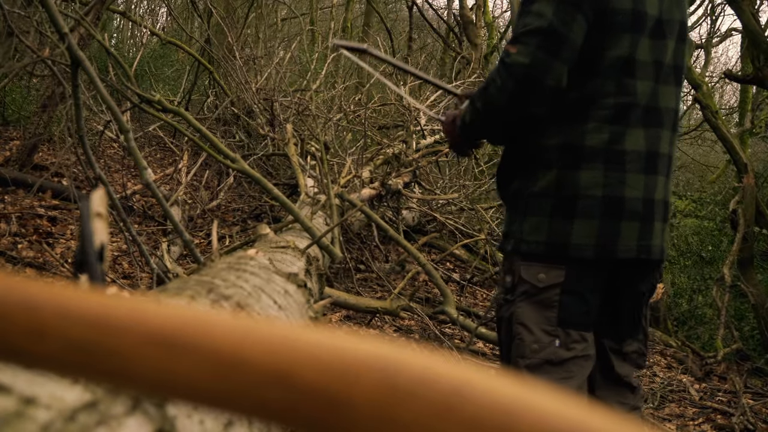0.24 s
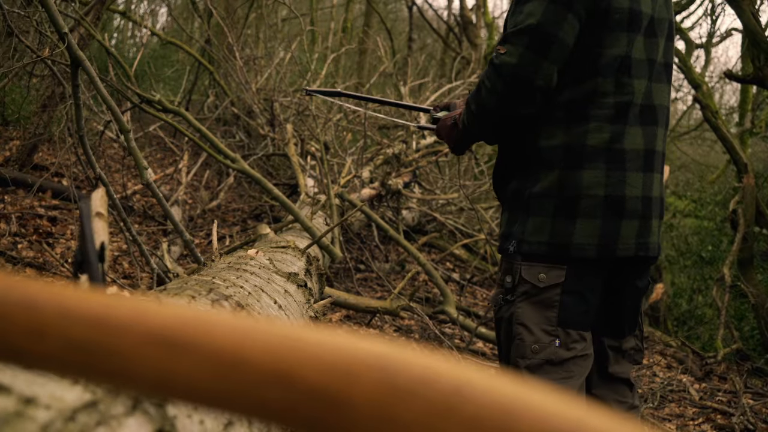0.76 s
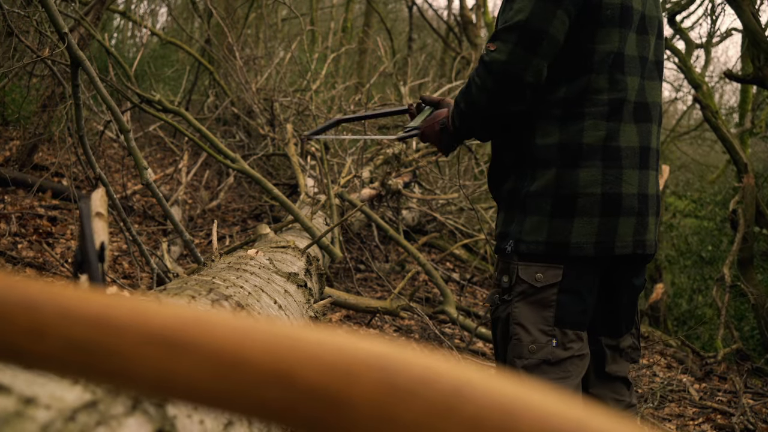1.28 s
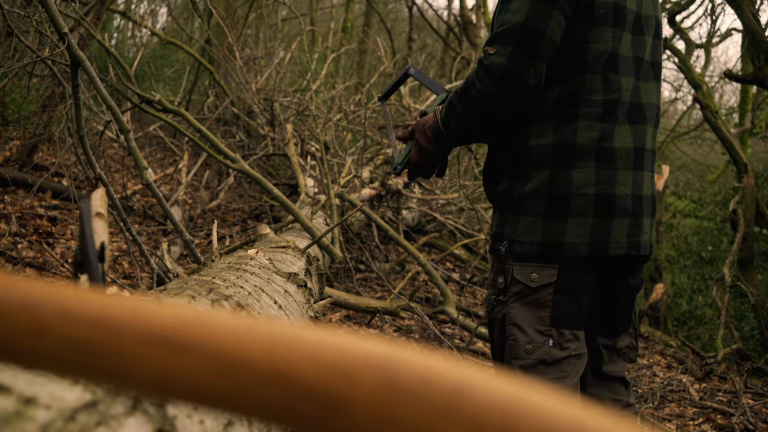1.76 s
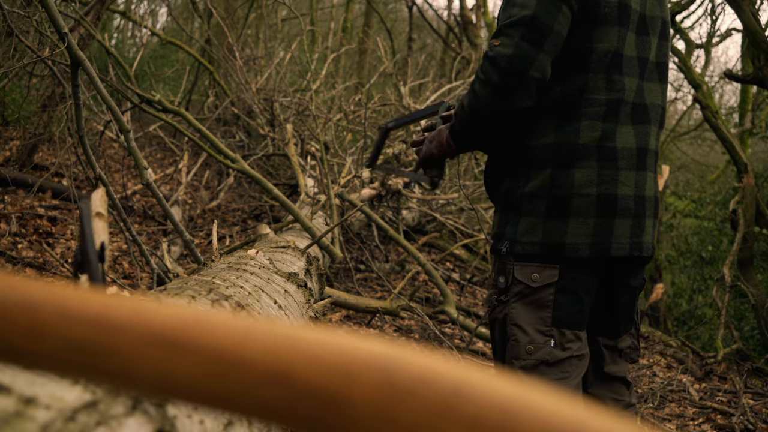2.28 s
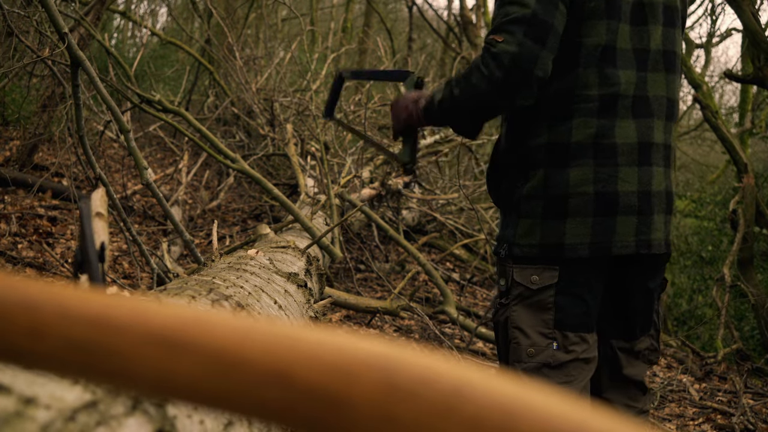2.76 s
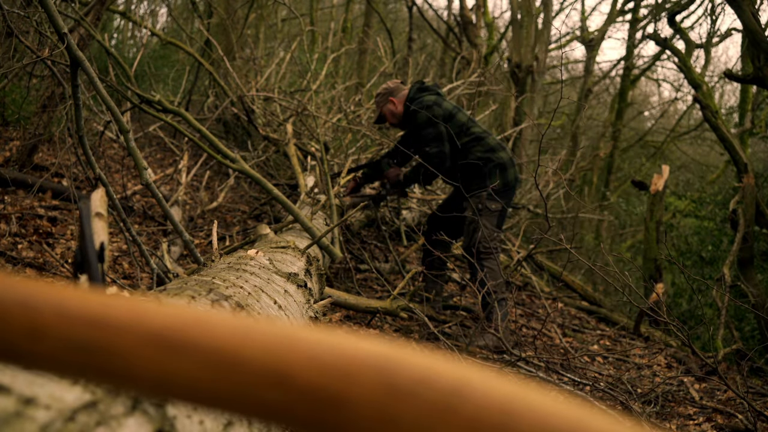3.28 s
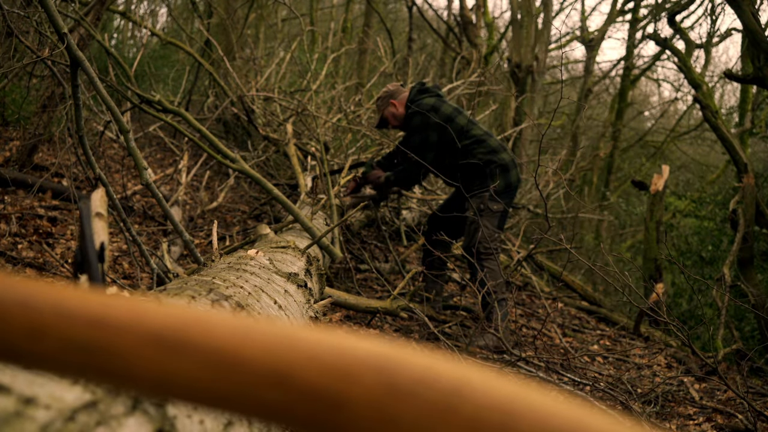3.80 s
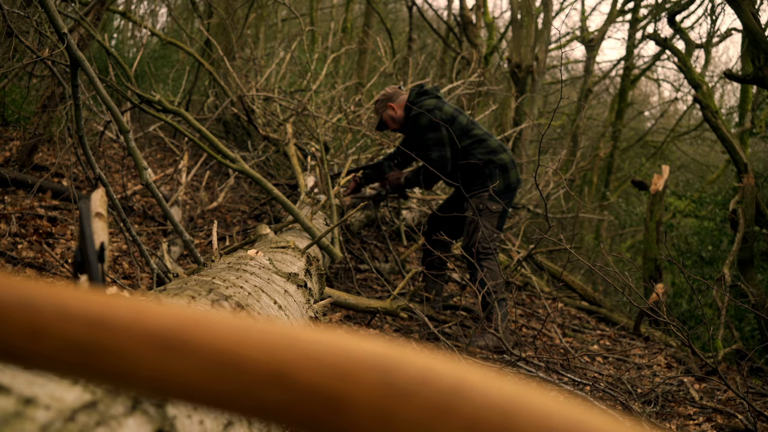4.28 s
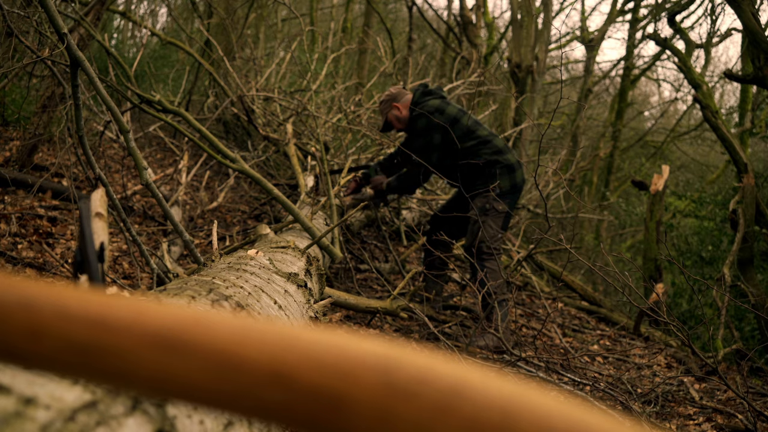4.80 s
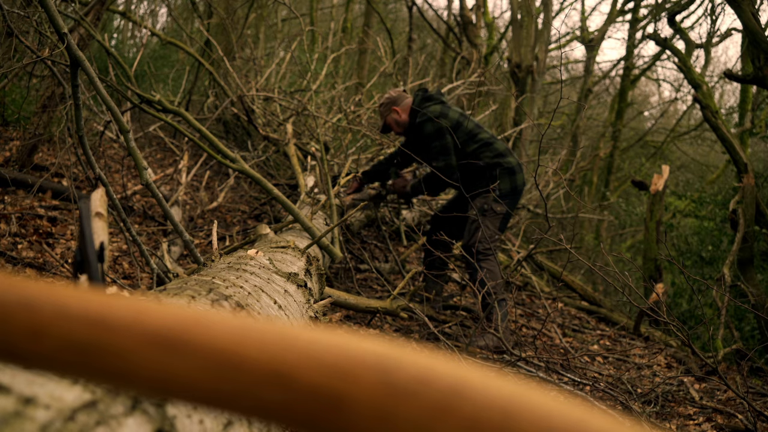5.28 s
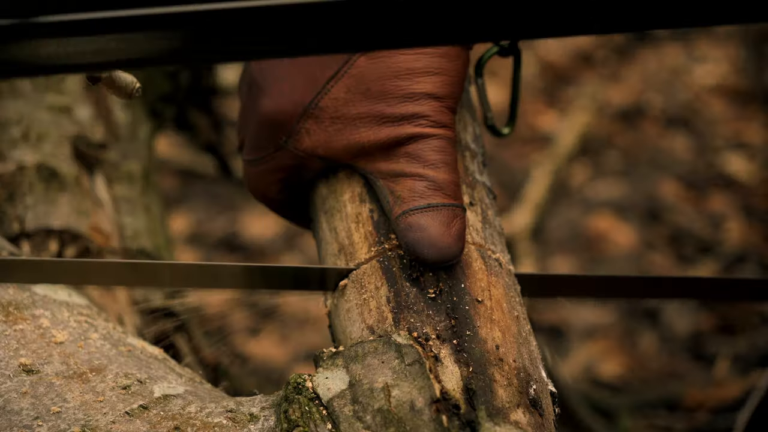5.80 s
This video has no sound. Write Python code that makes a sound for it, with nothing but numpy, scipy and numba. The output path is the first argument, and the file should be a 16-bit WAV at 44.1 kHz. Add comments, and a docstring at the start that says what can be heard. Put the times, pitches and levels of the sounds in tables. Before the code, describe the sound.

A folding bow saw scrapes, clicks and latches with a metallic snap, then rasps quickly back and forth through a branch in quiet woods.

```python
"""Over the far hum and faint leaves of a quiet wood, a folding bow saw is opened: its parts scrape and
click, and the trunks scatter a short echo. A latch snaps home and rings the metal frame.
Then the blade rasps to and fro through a branch: teeth tear fibres, the slot booms, the frame sings
along and the branch drones. Now and then the saw clicks, the blade squeals, a push ends abruptly
or the teeth catch."""
import sys
import numpy as np
from scipy import signal
from scipy.fft import rfft, irfft, next_fast_len
from scipy.io import wavfile
from scipy.ndimage import uniform_filter1d
from numba import njit

SR = 44100
rng = np.random.default_rng(int(sys.argv[2]) if len(sys.argv) > 2 else 0)


def wrap_up_sound(samples):
    """Save the sound to the file named by the first command line argument, as 16-bit audio."""
    columns = np.atleast_2d(samples).T
    # keep every value between -1 and 1, then stretch to whole-number steps
    tamed = np.clip(columns, -1, 1)
    steps = np.round(tamed * 32767).astype(np.int16)
    wavfile.write(sys.argv[1], SR, steps)


N = 266805


def undb(db):
    return 10 ** (np.asarray(db) / 20)


def rms(x):
    return np.sqrt(np.mean(x ** 2))


def unit(x):
    return x / rms(x)


def add(out, start_s, x):
    i = max(int(start_s * SR), 0)
    out[i:i + len(x)] += x[:N - i]


def colour(x, curve):
    """EQ through (hz, gain_db) points joined on a log axis."""
    size = next_fast_len(len(x))
    hz = np.maximum(np.arange(size // 2 + 1) * SR / size, 1)
    at_hz, db = np.transpose(curve)
    return irfft(rfft(x, size) * undb(np.interp(np.log(hz), np.log(at_hz), db)), size)[:len(x)]


@njit
def svf(x, hz, width):
    """State-variable band-pass with a moving centre, gain 1 there."""
    y, mid, low = np.empty(len(x)), 0., 0.
    for i in range(len(x)):
        g, damping = np.tan(np.pi * hz[i] / SR), width / hz[i]
        v = (mid + g * (x[i] - low)) / (1 + g * (g + damping))
        mid, low, y[i] = 2 * v - mid, low + 2 * g * v, damping * v
    return y


def band(x, hz, width):
    return svf(x, np.clip(hz * np.ones(len(x)), 20, .45 * SR), max(1. * width, 5.))


def walk(rate_hz):
    """Slow wobble: random levels, held and slewed twice; spread near 1."""
    hold = int(SR / rate_hz)
    steps = np.repeat(rng.standard_normal(N // hold + 1), hold)
    return 1.3 * uniform_filter1d(uniform_filter1d(steps, hold), hold)[:N]


def grit(per_s, spread_db, size=N):
    """Random impulses, a few of them much bigger than the rest."""
    hit = rng.random(size) < per_s / SR
    return unit(hit * rng.standard_normal(size) * undb(spread_db * rng.exponential(size=size)) + 1e-9)


def resonate(x, modes, shift_db):
    """A bank of resonances; the moving contact drives now one, now another."""
    out = 0
    for hz, width, db in modes:
        contact = undb(shift_db * (walk(25) + .5 * walk(6))[:len(x)])
        out += undb(db) * unit(band(x * contact, hz, width))
    return unit(out)


# Tone of the far hum: freq_hz, gain_db
HUM_EQ = [(35, -35.5), (60, -9), (107, -6.5), (196, -9), (248, -7.5), (298, -5.5), (585, -8), (810, -5),
          (1740, -16.5), (6560, -37), (15500, -79.5)]
# Fader moves of the ambience: time_s, hum_db, leaves_db
AMBIENCE = [(0, -54, -57.5), (.57, -52.5, -62), (.83, -53, -67), (1.07, -50.5, -67.5), (1.22, -53, -60.5),
            (1.66, -51, -59.5), (1.82, -60.5, -55.5), (1.99, -60.5, -64.5), (2.17, -60, -69.5),
            (2.45, -59, -72.5), (2.84, -55.5, -61.5)]


def wood():
    """A far hum that wavers a little, and leaves that rustle faintly."""
    at_s, hum_db, leaves_db = np.transpose(AMBIENCE)
    t = np.arange(N) / SR
    hum = unit(colour(rng.standard_normal(N), HUM_EQ)) * undb(np.interp(t, at_s, hum_db) + .6 * walk(14))
    leaves = unit(band(band(grit(8000, 1.3), 2500, 3000), 2900, 7000))
    return hum + leaves * undb(np.interp(t, at_s, leaves_db) + 1.5 * walk(15))


# Resonances of the held frame and blade: pitch_hz, width_hz, level_db
HELD_MODES = [(915, 90, 9.5), (985.8, 28, 2.5), (1192.7, 29, 13), (1430, 68, -6.5), (1532, 51, -14.5),
              (1993, 6.7, 12), (2117, 20, -27.5), (2286, 140, 4.5), (2457.2, 20, 17), (2600, 45, 14.5),
              (2853.5, 21.3, 17.5), (3367, 91, -12.5), (3501, 71, 18), (4041.5, 87, 14), (4506, 66.7, -1.5),
              (5174, 67, 3), (6800, 186.6, -9.5), (7480, 80, -14.5)]


def held_frame(friction, shift_db):
    """Frame and blade sing along with whatever rubs them."""
    return resonate(friction, HELD_MODES, shift_db)


# Parts sliding on each other: start_s, length_s, level_db, centre_hz, width_hz
SCRAPES = [(0, 0.0196, -39, 3800, 6000), (0.13, 0.029, -51, 4470, 6000), (0.223, 0.0144, -46, 5620, 6000),
           (0.346, 0.0444, -44, 3250, 4000), (0.468, 0.037, -47.5, 2810, 4000),
           (0.618, 0.0485, -47.5, 2570, 3800), (0.682, 0.0195, -40, 2730, 2500),
           (0.828, 0.0433, -44, 2660, 3000), (1.036, 0.048, -51, 4020, 6000),
           (1.691, 0.12, -50, 1000, 1200), (2.055, 0.093, -57.5, 2498, 1500),
           (2.097, 0.077, -55.5, 1766, 600), (2.381, 0.068, -63.5, 2950, 4900),
           (2.511, 0.074, -61, 1690, 1500), (6.028, 0.068, -42.5, 2510, 3000)]


def scrapes():
    """Uneven grit, coloured by the rubbing parts and the frame."""
    out = np.zeros(N)
    for start, length, db, hz, width in SCRAPES:
        size = int(length * SR)
        rub = unit(band(band(grit(12000, 1.4, size), hz, width), hz, 2 * width))
        add(out, start, undb(db + 1.8 * walk(150)[:size]) * np.hanning(size) ** 0.21 * rub)
    return 0.927 * out + 0.24 * rms(out) * held_frame(out, shift_db=0)


# Ring of the struck frame: pitch_hz, level_db, t60_s
FRAME_MODES = [(1210, -16, .06), (1933, -19, .45), (2019, -1, .22), (2185, -2, .25), (2440, -14, .08),
               (2471, -30, .55), (2612, -7, .11), (3570, -24, .08), (3980, -20, .05), (4650, -26, .06)]
# Hits on the frame itself, the loudest being the latch: start_s, level_db, knock_hz, tick_db
FRAME_HITS = [(0.004, -27.5, 1952, 7.5), (0.133, -31, 2040, 8), (0.224, -39, 2010, 2),
              (1.756, 6.5, 2520, 10.5), (1.761, -11, 1241, -7), (2.562, -43, 2250, -21)]
# Small parts clicking, in the opening and the sawing: start_s, level_db, knock_hz, tick_db
PART_HITS = [(0.154, -40, 2030, -7), (0.192, -21.5, 2040, 14.5), (0.299, -34, 2350, 6.5),
             (0.371, -12.5, 2225, 8.5), (0.447, -33, 888, 22.5), (0.475, -23, 1092, 5.5),
             (0.63, -30, 900, -13.5), (0.644, -31.5, 1027, -12.5), (0.67, -37, 3420, 3.5),
             (0.68, -27.5, 2730, -25.5), (0.704, -21, 1254, -27.5), (0.738, -43.5, 4000, 6),
             (0.864, -30, 3220, -10), (1.016, -22.5, 1087, -5), (1.117, -41.5, 803.6, 12.5),
             (2.514, -47, 930, -16), (2.816, -45, 1100, -10.5), (2.979, -21.5, 1297, 4.5),
             (4.208, -8, 2195, 10), (4.224, -14.5, 1790, 10), (4.259, -17.5, 792, 0.5),
             (4.584, -23.5, 1990, 8.5), (4.604, -8, 2810, 9.5), (4.935, -28, 4380, -7),
             (5.282, -30.5, 6000, 6.5), (5.489, -10, 514, 3), (5.515, -18.5, 4530, 3.5),
             (5.662, -24.5, 1890, -6.5), (5.823, -22.5, 999, -3.5)]


def clicks(hits, t60_s, ring_db):
    """A dull knock and a bright tick of the struck part; the frame rings and rattles on."""
    out, t = np.zeros(N), np.arange(SR // 2) / SR
    for start, db, hz, tick_db in hits:
        knock_t60 = t60_s * (1500 / hz) ** 0.32  # lower knocks last longer
        noise, phases = rng.standard_normal((3, len(t))), rng.random(len(FRAME_MODES))
        knock = unit(band(noise[0], hz, 0.192 * hz)) * undb(-60 * t / max(knock_t60, .005))
        tick = np.sign(noise[1]) * undb(tick_db - 60 * t / max(0.345 * t60_s, .004))
        rattle = unit(band(band(noise[2], 3500, 4700), 3000, 7000)) * undb(-19 - 60 * t / 0.283)
        ring = sum(undb(mode_db - 60 * t / t60) * np.sin(2 * np.pi * (mode_hz * t + phase))
                   for (mode_hz, mode_db, t60), phase in zip(FRAME_MODES, phases))
        blow = knock + tick
        blow /= 2 * rms(blow[:SR // 400])  # the first 2.5 ms set the level
        attack = np.minimum(t / 0.00148, 1)
        add(out, start, undb(db) * attack * (blow + undb(ring_db) * (ring + rattle)))
    return out


# Decay of the echo among the trunks: freq_hz, t60_s
ECHO_DECAY = [(300, 0.098), (2000, 0.36), (12000, 0.068)]


def trunks(x, echo_db=-23.5):
    """Scattered echoes: a short noise tail that hangs longest in the mids."""
    t, tail = np.arange(SR // 2) / SR, 0
    at_hz, t60s = np.transpose(ECHO_DECAY)
    for hz in 200 * 2 ** np.arange(0, 6.5, .5):
        t60 = np.interp(np.log(hz), np.log(at_hz), t60s)
        tail += hz ** -.15 * band(rng.standard_normal(len(t)), hz, hz / 2) * undb(-60 * t / t60)
    tail *= np.minimum(t / 0.0013, 1)
    return undb(echo_db) * signal.fftconvolve(x, tail / np.linalg.norm(tail))[:N]


# Blade strokes, push and pull in turn: start_s, length_s, level_db, peak_fraction
STROKES = [(2.842, 0.0602, -28.5, .6), (2.95, 0.1488, -31, 0.66), (3.09, 0.1691, -24.5, 0.59),
           (3.258, 0.1602, -25, 0.47), (3.41, 0.1595, -24.5, .55), (3.57, 0.171, -25, 0.55),
           (3.738, 0.1606, -22, 0.48), (3.889, 0.1729, -22, 0.65), (4.062, 0.1804, -25, 0.42),
           (4.229, 0.1791, -23, 0.56), (4.396, 0.1594, -19, 0.57), (4.559, 0.1802, -23, 0.55),
           (4.729, 0.1754, -20, 0.52), (4.893, 0.2115, -26, 0.66), (5.086, 0.1921, -20.5, 0.6),
           (5.273, 0.1992, -23.5, 0.57), (5.467, 0.1896, -19.5, 0.54), (5.662, 0.1733, -29, .58),
           (5.826, 0.1854, -23, .58)]
# Character of the push, then the pull: sharpness, boom_db, slot_start_hz, slot_end_hz
PUSH_PULL = [(1.292, -2, 1267, 1374), (0.87, -2, 1333, 1492)]


def strokes():
    """Control curves for the cut: blade speed swells and dies in each stroke."""
    t = np.arange(N) / SR
    speed, force, boom, shake = np.zeros((4, N))
    slot_hz = np.full(N, 1300.)
    for k, (start, length, db, peak) in enumerate(STROKES):
        sharpness, boom_db, start_hz, end_hz = PUSH_PULL[k % 2]
        on = (t >= start) & (t < start + length)
        progress = (t[on] - start) / length
        swell = np.sin(np.pi * progress ** (np.log(.5) / np.log(peak)))
        speed[on] = np.maximum(speed[on], swell)
        force[on] += undb(db) * swell ** sharpness
        # the slot booms only near full speed
        boom[on] += undb(db + boom_db) * swell ** (1.335 * sharpness)
        # the branch partly follows the stroke's level, and is shaken most as it takes hold
        shake[on] += undb(-37 + 0.82 * (db + 24) + 3.5 * (.5 - progress)) * swell ** 0.459
        slot_hz[on] = start_hz + (end_hz - start_hz) * progress
    return speed, force, boom, shake, slot_hz


def slot(tears, hz):
    """The sawn slot booms at a wavering pitch, with a broad band an octave up."""
    hz = hz * (1 + 0.0434 * walk(15))
    return unit(band(tears, hz, 322) + 0.225 * band(tears, 2 * hz, 2360))


# Tone of tearing fibres: freq_hz, gain_db
RASP_EQ = [(88, -58), (150, -11.5), (225, -11), (404, 3), (509, -15.5), (1040, 2.5), (1200, 0), (1730, 1.5),
           (2550, -2.5), (3620, -12), (3830, -23), (4140, -9.5), (7560, -8), (9180, -17.5), (15500, -43)]


def rasp(force, speed, t60_s=0.02584, ring_db=6.2, treble_hz=6040):
    """Each torn fibre rings countless close modes of blade and wood, changing as the contact moves."""
    t, ring = np.arange(int(t60_s * SR)) / SR, 0
    tears = force * grit(5000, 2.1)
    shares = np.array([undb(9 * walk(10)) for _ in range(6)])
    for share in shares / np.linalg.norm(shares, axis=0):  # crossfade among six noise tails
        tail = rng.standard_normal(len(t)) * undb(-60 * t / t60_s)
        ring += signal.fftconvolve(share * tears, tail / np.linalg.norm(tail))[:N]
    tearing = unit(colour(tears + undb(ring_db) * ring, RASP_EQ))
    dull = signal.sosfilt(signal.butter(2, treble_hz, fs=SR, output="sos"), tearing)
    bright = signal.sosfilt(signal.butter(2, treble_hz, "high", fs=SR, output="sos"), tearing)
    return dull - bright * (0.203 + 0.92 * speed) ** 0.6  # the treble fades as the blade slows


# Body of the branch: pitch_hz, width_hz, level_db
BRANCH_MODES = [(116.9, 76, -8.5), (202.6, 87, -10), (335.5, 136, -1), (397.46, 10.8, -7)]


def branch(shake):
    """The teeth shake the branch into a low drone."""
    return rms(shake) * resonate(shake * grit(2500, 1.6), BRANCH_MODES, shift_db=3)


# Short accents in the cut, a push ending abruptly or the teeth catching:
# centre_s, half_length_s, cut_boost_db, branch_boost_db
ACCENTS = [(3.544, 0.0165, 10, 11), (3.872, 0.0161, 6, 0.5), (4.108, 0.0227, 4.5, 9.5),
           (4.168, 0.0187, 9.5, 17.5), (4.612, 0.0128, 2.5, 5), (4.866, 0.0147, 6, -1.5),
           (4.955, 0.0144, 7, 12), (5.219, 0.0348, 5, -6.5), (5.446, 0.019, 4, 5.5),
           (5.614, 0.016, 1.5, 4.5), (5.984, 0.011, 6, 4.5)]
# Tone of the cut at the microphone: freq_hz, gain_db
SAW_EQ = [(40, -8.5), (90, -4.5), (9000, -3.5), (11000, -11.5), (13000, -21.5), (15500, -25)]


def saw():
    """Juddering teeth tear fibres, which drive slot, frame and branch."""
    t = np.arange(N) / SR
    speed, force, boom, shake, slot_hz = strokes()
    accent_db, shake_db = sum(np.outer(boosts_db, np.exp(-2 * ((t - centre) / half_length) ** 2))
                              for centre, half_length, *boosts_db in ACCENTS)
    judder = undb(accent_db + 1.63 * walk(60))
    tears = grit(6000, 1.47)
    hollow = boom * judder * slot(tears, slot_hz)
    fibres = undb(-1) * rasp(force * judder, speed)
    frame = undb(-5.5) * held_frame(force * judder * tears, shift_db=4.84)
    drone = branch(shake * undb(shake_db))
    return colour(rms(force) * (fibres + frame) + hollow + drone, SAW_EQ)


# The clearest squeals of the blade: centre_s, pitch_hz, level_db
SQUEALS = [(3.19, 1255, -29), (3.82, 1165, -31), (4.13, 1156, -29.5), (4.16, 2310, -29),
           (4.168, 984, -29.5), (4.64, 1468, -28.5), (4.78, 2473, -32), (4.83, 1496, -32.5),
           (5.15, 2570, -29.5), (5.342, 2855, -31), (5.57, 1196, -23), (5.604, 3562, -36)]


def squeals(length_s=.064, faint_per_stroke=3):
    """Friction feeds one narrow mode, which swells and dies; strokes after the first add faint ones."""
    out, size, faint = np.zeros(N), int(length_s * SR), []
    for start, length, db, _ in STROKES[1:]:
        for when, pick in rng.random((faint_per_stroke, 2)):
            hz = HELD_MODES[int(pick * len(HELD_MODES))][0]
            faint_db = db - 12 - 2 * np.log2(hz / 1200)  # higher ones are softer
            faint.append((start + (0.27 + .55 * when) * length, hz, faint_db))
    for centre, hz, db in list(SQUEALS) + faint:
        tone = unit(band(band(grit(5000, 2.69, size), hz, 76), hz, 150))
        add(out, centre - length_s / 2, undb(db) * np.hanning(size) * tone)
    return out


# Tone of the clicks and scrapes at the microphone, with the treble rolled off: freq_hz, gain_db
HANDLING_EQ = [(150, -12), (700, 0.5), (4000, 2.5), (8000, -2.5), (11000, -12.5), (15500, -44)]


def scene():
    """The saw up close and its echo, over the ambience of the wood; mono."""
    ticks = clicks(PART_HITS, t60_s=0.0326, ring_db=-34.5)
    latch = clicks(FRAME_HITS, t60_s=0.02395, ring_db=-19.5)
    near = colour(ticks + latch + scrapes(), HANDLING_EQ) + saw() + squeals()
    return (near + trunks(near) + wood())[None]


def record(dry, rumble_hz=60, top_hz=15700):
    """Master chain: cut the rumble, round the loudest peak, cut the top."""
    dry = signal.sosfilt(signal.butter(4, rumble_hz, "high", fs=SR, output="sos"), dry)
    rounded = .5 * np.tanh(2 * dry)
    return signal.sosfilt(signal.ellip(8, .2, 80, top_hz, fs=SR, output="sos"), rounded)


dry = scene()
out = record(dry)
wrap_up_sound(out)
```